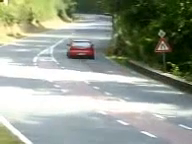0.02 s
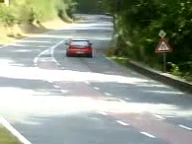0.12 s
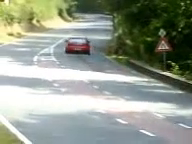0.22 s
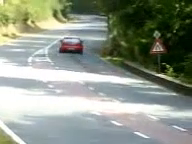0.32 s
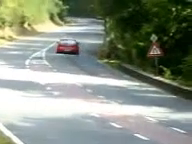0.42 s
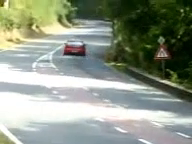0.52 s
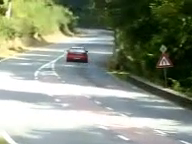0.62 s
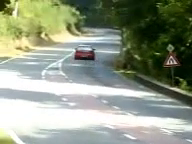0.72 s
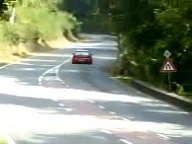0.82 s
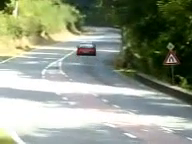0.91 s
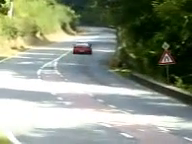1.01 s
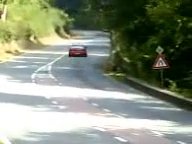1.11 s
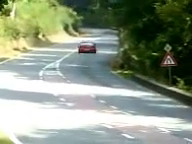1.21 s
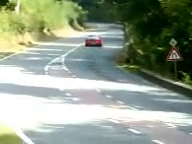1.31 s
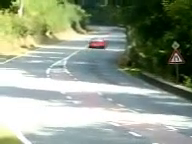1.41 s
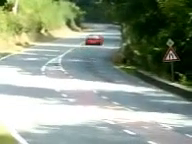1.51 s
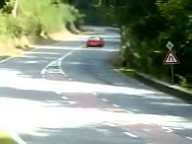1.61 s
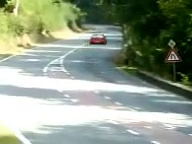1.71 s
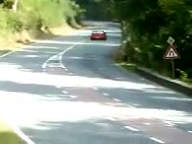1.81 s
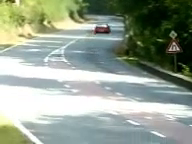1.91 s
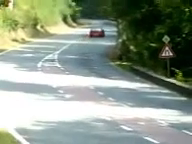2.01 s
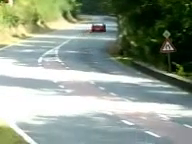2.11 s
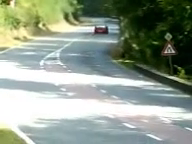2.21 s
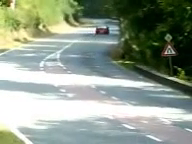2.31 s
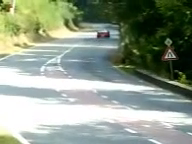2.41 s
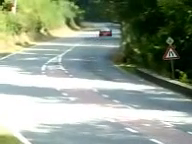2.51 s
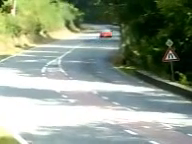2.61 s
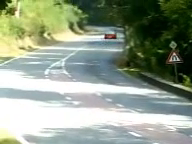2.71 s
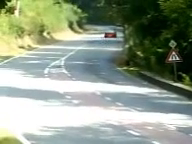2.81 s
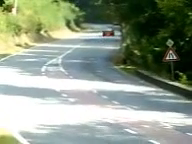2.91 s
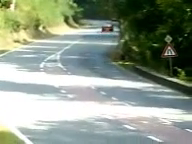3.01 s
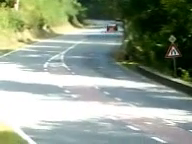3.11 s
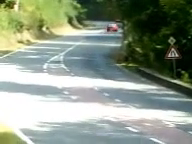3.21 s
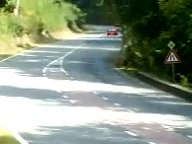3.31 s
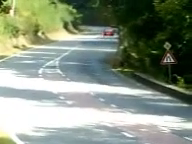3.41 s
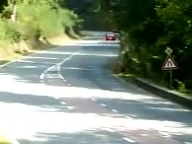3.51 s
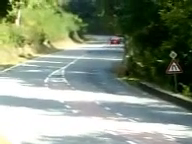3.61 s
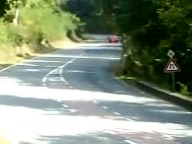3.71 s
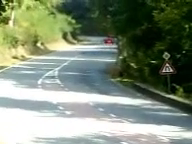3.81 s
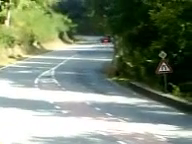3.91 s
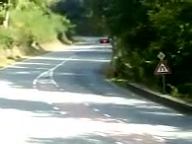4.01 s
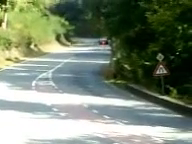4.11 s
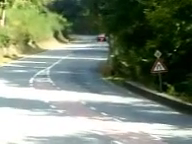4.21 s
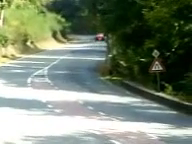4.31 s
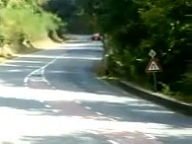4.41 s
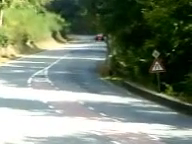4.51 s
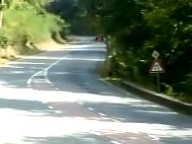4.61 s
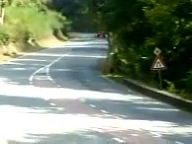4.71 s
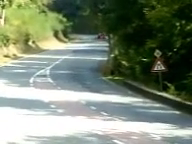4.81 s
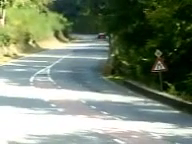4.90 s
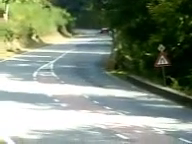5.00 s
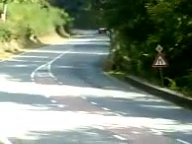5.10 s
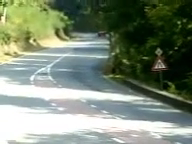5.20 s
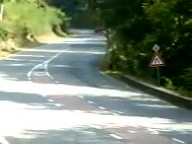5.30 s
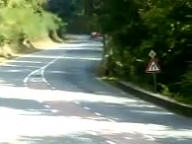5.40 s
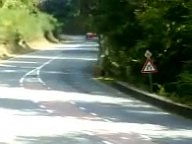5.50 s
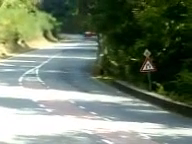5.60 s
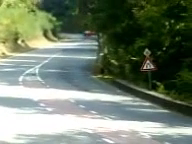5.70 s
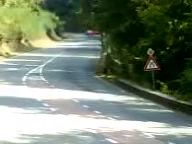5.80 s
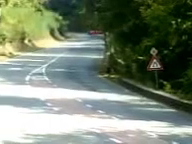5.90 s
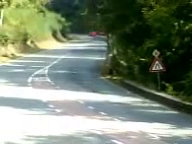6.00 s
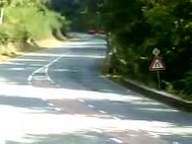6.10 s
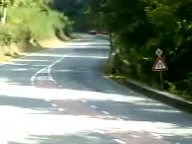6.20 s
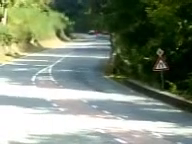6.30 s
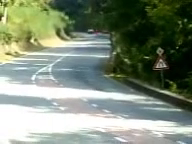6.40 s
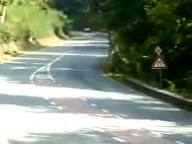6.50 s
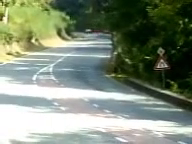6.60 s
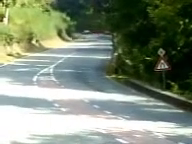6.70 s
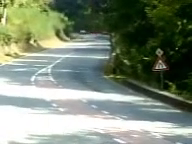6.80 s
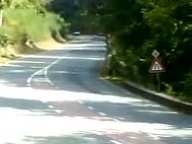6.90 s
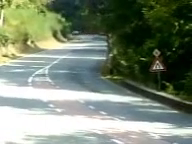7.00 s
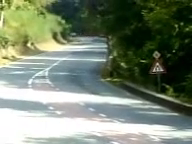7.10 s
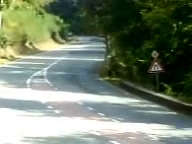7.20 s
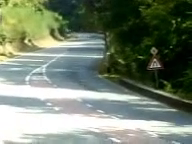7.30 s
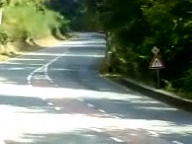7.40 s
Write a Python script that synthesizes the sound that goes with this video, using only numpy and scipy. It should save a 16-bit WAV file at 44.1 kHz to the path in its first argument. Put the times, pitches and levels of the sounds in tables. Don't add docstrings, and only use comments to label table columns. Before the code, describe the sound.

A car at full throttle roars away up a tree-lined road, its raspy engine note climbing slowly as it fades into the distance.

```python
import sys
import numpy as np
from scipy import signal
from scipy.io import wavfile
from scipy.ndimage import uniform_filter1d, minimum_filter1d

SR = 44100
rng = np.random.default_rng(int(sys.argv[2]) if len(sys.argv) > 2 else 0)


def invert_db(level):
    return 10 ** (np.asarray(level, dtype=float) / 20)


def bounce(signal):
    frames = np.transpose(np.atleast_2d(signal))
    limited = np.clip(frames, -1, 1)
    pcm = np.round(limited * 32767).astype(np.int16)
    wavfile.write(sys.argv[1], SR, pcm)


N = 330309
TOP_HZ = 4050
HOP = 128

# t/s, f/Hz
FIRING = [(0.0, 149.6), (0.5, 153.7), (0.75, 155.6), (1.0, 156.9), (1.75, 161.6), (2.5, 166.5),
          (4.0, 175.2), (4.25, 176.3), (5.0, 180.2), (5.75, 184.1), (6.5, 187.0), (7.0, 188.7),
          (7.49, 189.9)]


def engine():
    # t/s, level/dB
    exhaust = [(0, -14), (.25, -19), (1.2, -14.5), (1.5, -17.5), (1.9, -22.5), (2.4, -22.5), (3.05, -26.5),
               (3.4, -23.5), (4.0, -26.5), (4.5, -20.5), (4.8, -23.5), (5.12, -32), (5.37, -19),
               (5.75, -28.5), (6.0, -21.5), (6.8, -26), (7.25, -36.5), (7.49, -31)]
    # centre t/s, length/s, order, level/dB
    swells = [(0.112, 0.2, 2, 3.5), (0.252, .12, 1, -3.5), (2.913, 1.6, 1, -3.5), (0.622, 0.068, 3, -8),
              (0.878, .1, 3, -2), (2.305, 2.23, 3, -12), (3.35, .25, 3, 4), (3.618, 0.27, 3, -6.5),
              (4.036, .25, 3, -7.5), (4.3, 0.35, 3, 4), (5.0, 0.24, 3, -5.5), (5.516, 0.094, 3, 6.5),
              (5.617, 0.075, 3, -0.5), (5.8, 0.25, 3, 2.5), (6.63, 0.27, 3, -6.5), (7.254, 0.62, 3, -19.5),
              (3.75, 0.2, 2, 3), (4.636, 0.11, 2, -0.5)]
    # f/Hz, level/dB
    rasp_colour = [(400, -12), (700, 4.5), (1200, 0), (2000, 2.5), (2800, -3), (3200, -9.5), (3600, -24),
                   (4000, -37.5)]
    # f/Hz, ratio
    fade = [(150, .06), (330, .2), (600, .4), (1000, .75), (1500, .9), (3500, 1.2)]
    # f/Hz, level/dB
    uneven = [(150, -26), (600, -20), (1500, -12), (3000, -7), (3600, -2)]
    step, orders_heard, low_orders = 32, 25, 3

    points = N // step + 2
    steps = SR / step
    s = np.arange(points) * step / SR
    rate = np.interp(s, *np.transpose(FIRING))
    order = np.arange(1, orders_heard + 1)[:, None]
    hz = order * rate
    near = 1 / (1 + (s / 2.3) ** 4)

    first_db = distant_db(s, start_db=-22, share=0.91, bend_db=7)
    second_db = np.interp(s, *np.transpose(exhaust))
    third_db = distant_db(s, start_db=-11.5, share=1.035, bend_db=4.8)
    low_db = np.array([first_db, second_db, third_db])
    for mid, length, which, db in swells:
        low_db[int(round(which)) - 1] += db * hump(s, mid, length)

    rasp_db = distant_db(s, start_db=-33.5, share=0.65, bend_db=1)
    rasp_db = rasp_db + colour(rasp_colour, hz) - 0.085 * s * (hz / 1000 - 5.0)
    rasp = invert_db(2 * rasp_db) * (hz < TOP_HZ)
    size = np.sqrt(rasp + glint_power(s, order))

    direct_share = rasp / (size ** 2 + 1e-12)
    scatter = colour(fade, hz) * np.maximum(direct_share, .22 + .22 * near)
    fading = walk(orders_heard, points, steps / 17.3) + 1j * walk(orders_heard, points, steps / 39.0)
    waver = (1 + scatter * fading) * np.sqrt(2 / (1 + 2 * scatter ** 2))
    size[:low_orders] = invert_db(low_db)

    path_drift = uniform_filter1d(walk(orders_heard, points, steps / 2), size=3, axis=0)
    slide = (hz / 1100) ** 1.2 * path_drift
    slide = slide + .07 * order * walk(1, points, steps / 14)
    leaves = walk(orders_heard, points, steps / 12)
    slide = slide + (.45 + .25 * near) * (hz / 2000) ** 2 * leaves
    slide = slide + np.interp(s, [1.5, 3, 6], [np.pi, np.pi / 4, np.pi / 2])
    pipe_end = np.interp(s, [1, 2.5], [np.pi, np.pi / 2]) * (order > low_orders)
    phase = np.exp(1j * (slide + pipe_end))

    blur = walk(orders_heard, points, steps / 150.) + 1j * walk(orders_heard, points, steps / 150.)
    blur = np.sqrt(3) * uniform_filter1d(blur.real, size=3, axis=0) + 1j * blur.imag
    blur = invert_db(colour(uneven, hz) + 3.1 * near) * blur
    arrival = size * phase * (waver + blur)

    t = np.arange(N) / SR
    turn = np.exp(2j * np.pi * np.cumsum(np.interp(t, s, rate)) / SR)
    sound, carrier = np.zeros(N), np.ones(N, complex)
    for row in arrival:
        carrier = carrier * turn
        sound += np.interp(t, s, row.real) * carrier.real
        sound -= np.interp(t, s, row.imag) * carrier.imag
    return sound


def glint_power(s, order):
    # centre t/s, length/s, order, width/orders, level/dB
    faces = [(0, .36, 20.4, 1.3, -26), (.205, .17, 4.2, 3.1, -21.5), (.312, 0.89, 12.4, 4.6, -30.5),
             (.33, 0.58, 17.6, 2.0, -25.5), (.423, 0.23, 13.4, 1.3, -25), (.608, 0.35, 19, 1.5, -29),
             (.753, 1.4, 18, 1.8, -36), (.78, .44, 9, 1.0, -21.5), (.95, 0.15, 16.8, 4, -28.5),
             (1.03, 0.23, 5.5, 3, -40.5), (1.39, 0.074, 17.8, 2, -32), (1.793, 0.23, 10.3, 2.1, -26),
             (1.782, 1.6, 14.6, 5.4, -36.5), (2.385, 0.52, 9.4, 3.7, -24.5), (2.59, 0.24, 11.3, 1.5, -23.5),
             (2.8, 0.13, 15, 4, -36), (3.425, 1.33, 8.7, 1.5, -26), (4.065, 0.77, 15.6, 1.4, -34.5),
             (4.625, 0.34, 12, 2.1, -40), (5.142, 0.57, 8.6, 3.6, -36.5), (5.4, 0.57, 6.7, 1.2, -26),
             (6.332, 1.63, 3.6, 5.3, -33), (6.4, 0.52, 9.8, 3, -42.5), (7.5, 0.22, 8.4, 1.3, -37.5)]
    # centre t/s, length/s, order, level/dB
    glints = [(.04, .12, 11.8, -21), (0.24, 0.5, 17.5, -26), (0.321, 0.68, 5.1, -18.5),
              (0.351, .83, 14, -27), (0.614, 0.26, 12, -24), (0.712, .15, 14.4, -19),
              (5.06, .14, 11, -32.5), (1.452, 0.32, 15, -29.5), (1.46, .28, 7, -32),
              (1.723, .107, 12.6, -21), (1.737, 0.24, 17.7, -29.5), (1.981, 0.23, 15.3, -22),
              (2.12, .26, 7, -26), (2.091, 0.12, 10.3, -20.5), (2.129, 0.38, 13.1, -24),
              (2.376, 0.15, 11.3, -17.5), (2.38, 0.28, 9, -21), (2.795, 0.19, 8.1, -20),
              (3.015, .53, 7.8, -22.5), (3.257, 0.26, 16.1, -26), (3.834, 1.8, 3.8, -32.5),
              (3.89, 0.17, 9.1, -18), (4.052, 0.57, 9.3, -16), (4.507, 0.17, 9, -22), (5.024, 0.37, 9, -25),
              (5.175, 0.073, 12.7, -30), (5.646, 0.67, 3.6, -23.5), (6.7, 0.42, 7, -30),
              (7.04, 0.45, 3.7, -20.5), (7.39, 0.32, 5.9, -31.5)]
    sharp = 0.74
    rows = faces + [(mid, length, centre, sharp, db) for mid, length, centre, db in glints]
    return sum(invert_db(2 * db) * hump(s, mid, length, order=4) * hump(order, centre, width)
               for mid, length, centre, width, db in rows)


def roar():
    # f/Hz, start level/dB per Hz, share of spreading loss, gain in the bend/dB
    distance_law = [(90, -50.5, 1.014, -2), (463, -46.5, 1.254, 14), (1210, -52, 0.97, 5.5),
                    (2410, -44.5, 1.365, -0.5)]
    # f/Hz, level/dB
    edge = [(20, -29.5), (60, -2.5), (100, 6), (2700, 3), (3100, -5.5), (3500, -11), (4000, -28)]
    # centre t/s, length/s, level/dB
    puffs = [
        (0.973, 0.059, 1.5),
        (4.236, 0.061, 5),
        (5.21, 0.069, 4.5),
        (5.945, .05, 2.5),
        (6.129, 0.035, 5),
        (6.356, .03, 6),
        (6.721, .04, 5.5),
        (7.029, 0.054, 6.5),
    ]
    halo_db = -50.5

    hz, s, noise = signal.stft(rng.standard_normal(N), SR, nperseg=8 * HOP, noverlap=7 * HOP)
    hz = np.maximum(hz, 1)
    centres, *law = np.transpose(distance_law)
    settings = [np.interp(np.log(hz), np.log(centres), column)[:, None] for column in law]
    db = distant_db(s, *settings)

    heard = hz < TOP_HZ
    order = hz[heard, None] / np.interp(s, *np.transpose(FIRING))
    halo = glint_power(s, order) * invert_db(2 * halo_db)
    db[heard] = 10 * np.log10(invert_db(2 * db[heard]) + halo)

    patches = uniform_filter1d(walk(len(hz), len(s), SR / HOP / 8.2), size=9, axis=0) * 3
    db = db + colour(edge, hz)[:, None] - 7.0
    db = db + 1.6 * np.minimum(hz / 400, 1)[:, None] * patches
    db = db + sum(puff_db * hump(s, mid, length) for mid, length, puff_db in puffs)
    cells = noise * invert_db(db) * np.sqrt(SR / 2)
    return signal.istft(cells, SR, nperseg=8 * HOP, noverlap=7 * HOP)[1][:N]


def air(sound):
    # f/Hz, spread/dB
    gust = [(200, 0), (1000, .8), (2000, 2.1), (3600, 3.0)]
    hz, s, cells = signal.stft(sound, SR, nperseg=4 * HOP, noverlap=3 * HOP)
    hz = np.maximum(hz, 1)[:, None]
    eddies = uniform_filter1d(walk(len(hz), len(s), SR / HOP / 16.), size=4, axis=0) * 2
    db = shadow_db(s, hz) + colour(gust, hz) * eddies
    return signal.istft(cells * invert_db(db), SR, nperseg=4 * HOP, noverlap=3 * HOP)[1][:N]


def shadow_db(s, hz):
    # centre t/s, length/s, f/Hz, width/Hz, level/dB
    shadows = [(0.889, 0.047, 1436, 504, -21), (1.19, 0.09, 1560, 1100, -12.5), (2.01, 0.75, 960, 397, -10),
               (1.3, 0.24, 1050, 440, -5.5), (3.42, 0.2, 1800, 600, -6.5), (9.9, 0.11, 1800, 600, -9.5),
               (5.645, .4, 2080, 600, -14.5), (6.398, 0.18, 1720, 500, -13), (7.307, 0.26, 2800, 498, -7),
               (2.48, 1.8, 3450, 730, -13), (3.4, 0.54, 2300, 590, -11), (5.7, 0.44, 3100, 420, -8),
               (6.45, 0.27, 3200, 1400, -6.5), (4.36, 0.42, 3470, 630, 9), (5.02, 0.56, 3100, 900, 6.5),
               (7.05, 0.19, 2900, 680, 7), (6.27, .15, 3600, 250, 21), (3.6, 0.66, 970, 230, -6),
               (4.35, .35, 60, 160, 6.5), (3.4, 1.3, 70, 120, -5), (1.99, 0.19, 2800, 460, 3.5),
               (3.3, 0.69, 1190, 110, 10.5), (2.8, .2, 860, 100, 8), (3.05, .35, 2200, 200, 5.5)]
    return sum(db * hump(s, mid, length) * hump(hz, centre_hz, width)
               for mid, length, centre_hz, width, db in shadows)


def distant_db(s, start_db, share, bend_db):
    doubling_s = 0.58
    bend_s, rise_s, fade_s = 5.27, 0.089, 3.7
    bend = np.exp(-np.maximum(s - bend_s, 0) / fade_s) / (1 + np.exp(-(s - bend_s) / rise_s))
    return start_db - share * 20 * np.log10(1 + s / doubling_s) + bend_db * bend


def colour(table, hz):
    points = np.array(table, float)
    return np.interp(np.log(hz), np.log(points[:, 0]), points[:, 1])


def walk(rows, length, hold):
    size = max(int(hold), 1)
    x = uniform_filter1d(uniform_filter1d(rng.standard_normal((rows, length)), size), size)
    return x / x.std()


def hump(x, centre, width, order=2):
    return np.exp(-(2 * (x - centre) / width) ** order)


def scene():
    return air(engine() + roar())[None]


def low_pass(x):
    return signal.sosfilt(signal.butter(12, 15830, fs=SR, output="sos"), x)


def record(dry):
    # start t/s, end t/s, share shaved off
    bite = [
        (-.02, 0.33, 0.28),
        (.366, .437, 0.21),
        (.456, .638, .2),
        (.663, .69, 0.13),
    ]
    # t/s, level/dB
    late_tips = [
        (.349, -36),
        (.7, -38),
        (0.9439, -41),
        (2.385, -35.5),
        (7.488, -44.5),
    ]
    overload, mirror_hz, edge_s = .72, 10620, 0.0022
    t = np.arange(N) / SR
    narrow = signal.sosfilt(signal.ellip(10, .2, 90, TOP_HZ, fs=SR, output="sos"), dry)

    peak = uniform_filter1d(-minimum_filter1d(-abs(narrow), size=500), size=250) + 1e-9
    shaved = sum(share * np.clip(np.minimum(t - start, end - t) / edge_s, 0, 1)
                 for start, end, share in bite)
    shaved = shaved * (1 + 0.2 * walk(1, N, SR / 90))
    limit = peak * (1 - np.clip(shaved, 0, .5))
    flat = np.clip(narrow, -limit, limit) * np.minimum(1, overload / limit)

    mirror = np.gradient(narrow, axis=1) * np.cos(2 * np.pi * mirror_hz * t)
    flat = flat + invert_db(-56) * mirror
    flat = flat + invert_db(-99) * rng.standard_normal(N)
    flat = flat * np.minimum(1, (t[-1] - t) / .004)
    for s, db in late_tips:
        flat[:, int(s * SR) + np.arange(3)] -= invert_db(db + 6.5) * np.hanning(5)[1:-1]
    return low_pass(flat)


dry = scene()
out = record(dry)
bounce(out)
```